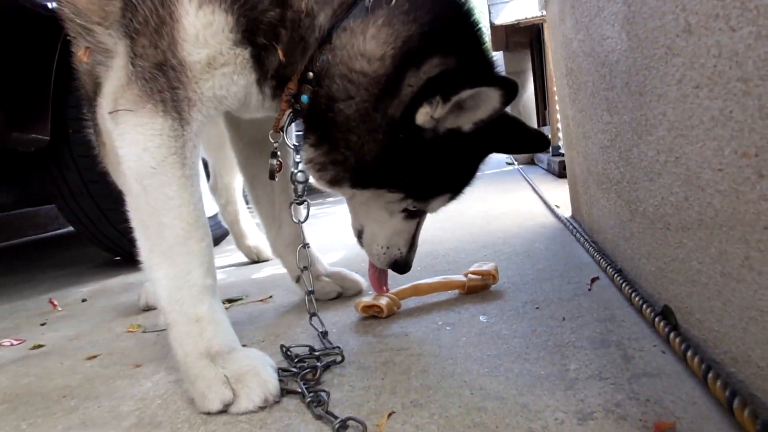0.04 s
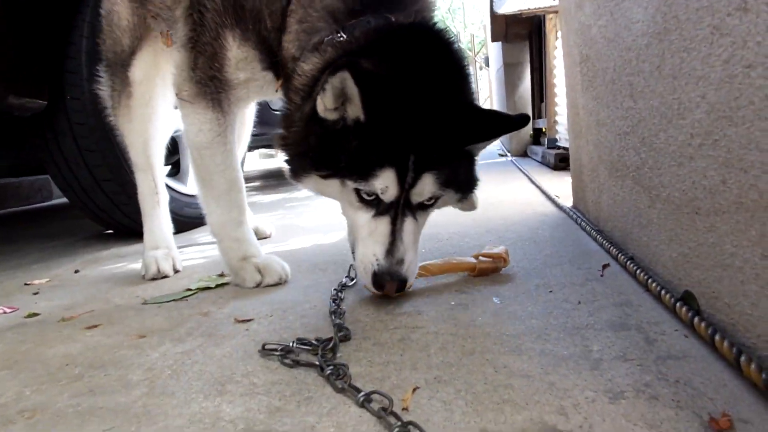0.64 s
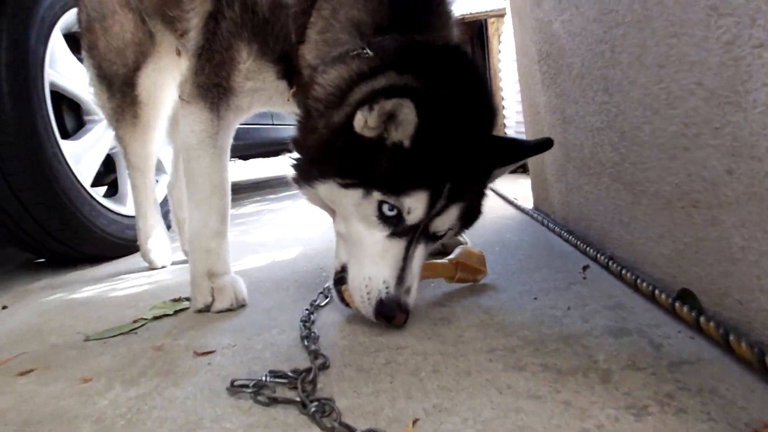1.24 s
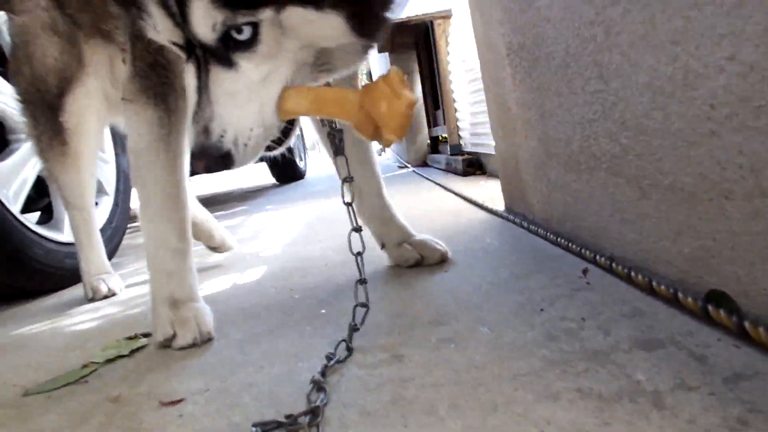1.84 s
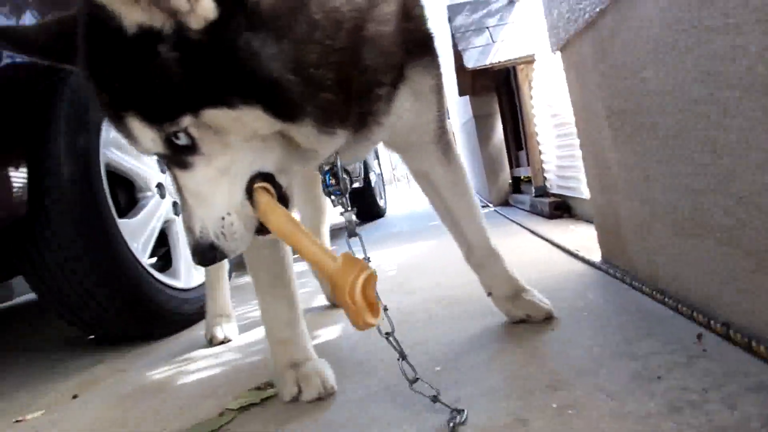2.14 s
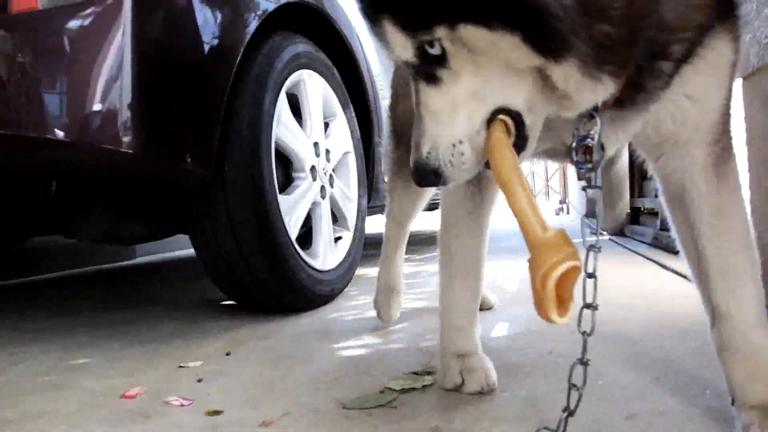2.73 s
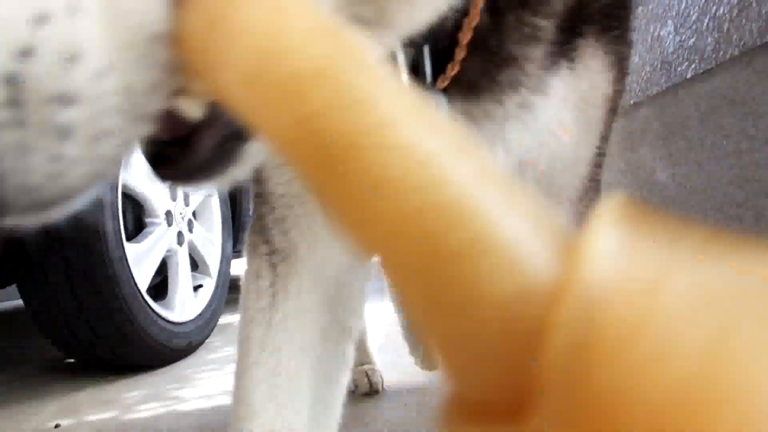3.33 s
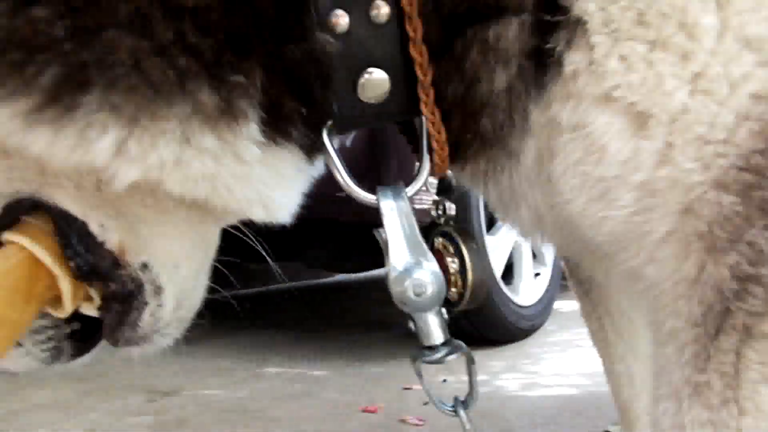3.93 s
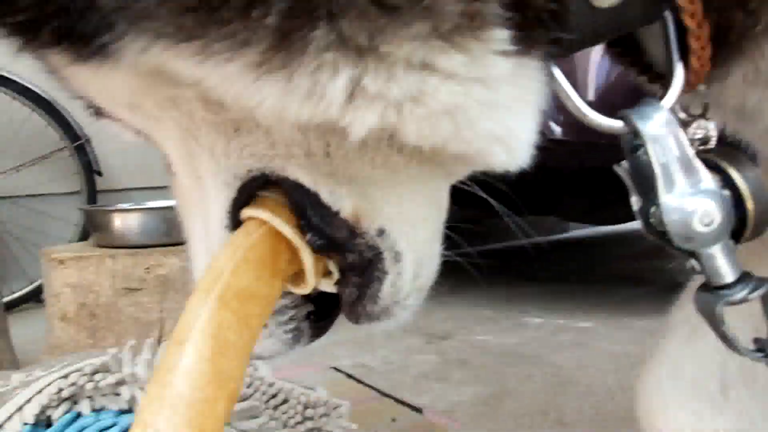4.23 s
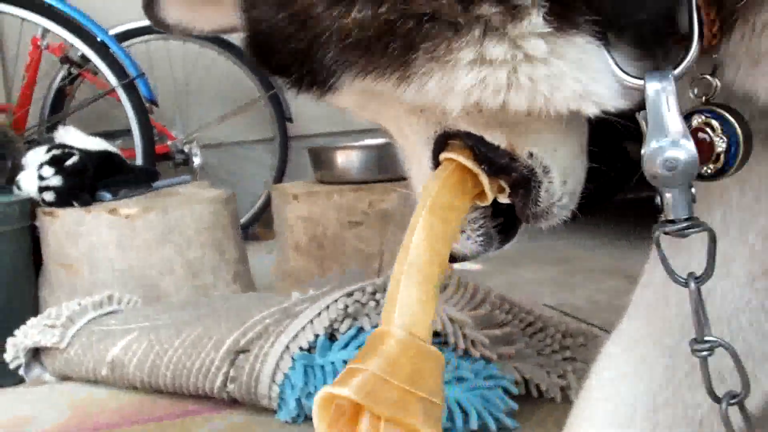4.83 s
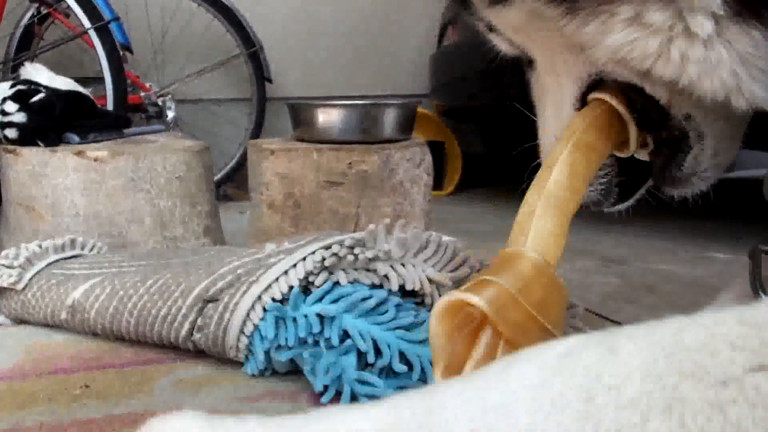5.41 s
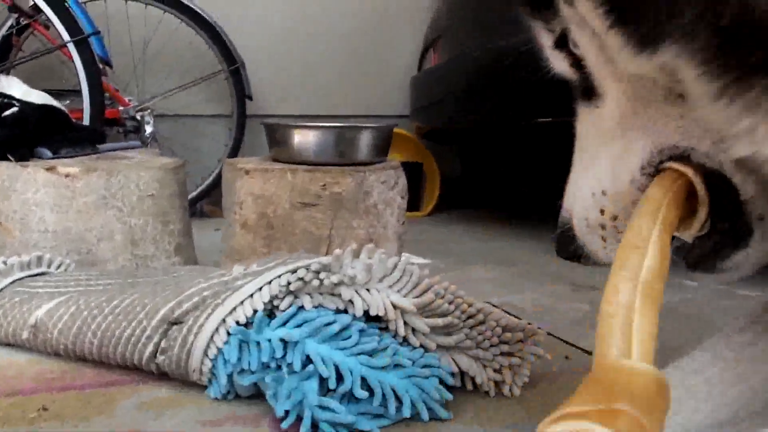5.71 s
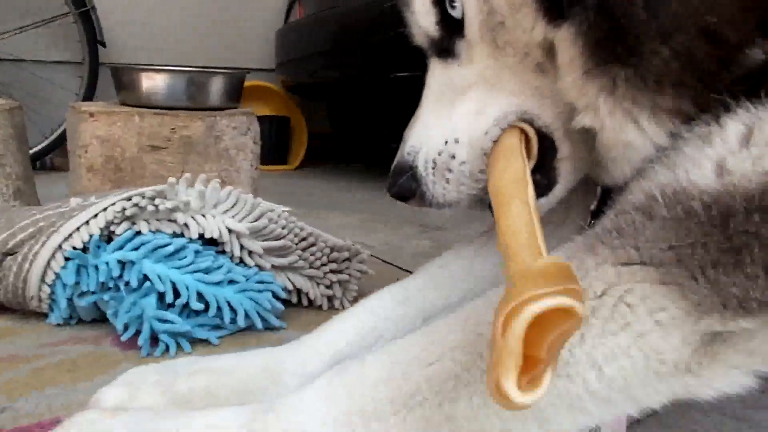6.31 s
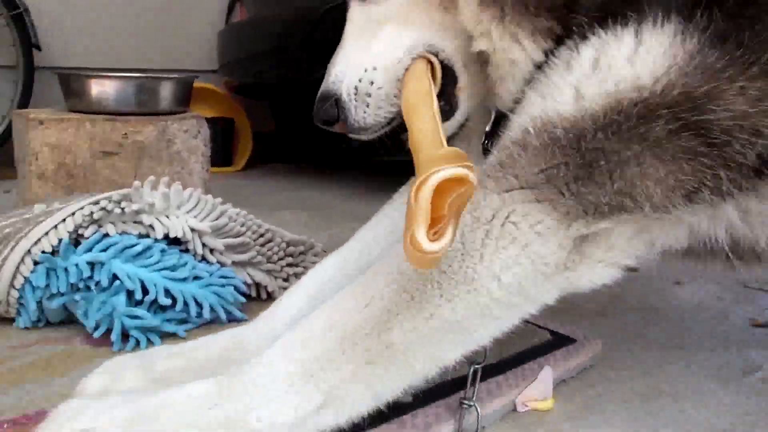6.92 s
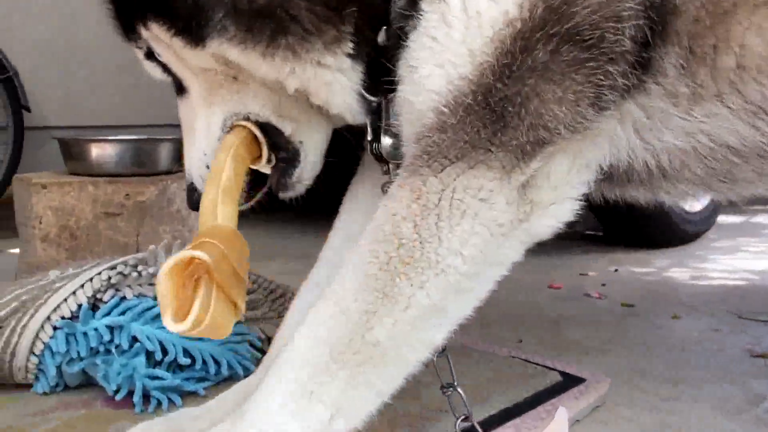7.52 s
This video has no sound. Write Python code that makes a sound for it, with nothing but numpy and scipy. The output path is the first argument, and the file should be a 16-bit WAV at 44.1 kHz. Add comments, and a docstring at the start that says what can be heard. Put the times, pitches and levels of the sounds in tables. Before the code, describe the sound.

A dog moves about a concrete carport, its chain clinking lightly and its paws scuffing. A rawhide bone clicks against the floor and teeth. Midway the bone knocks once right by the microphone, then crunches and creaks in the jaws. Softer chain pings, fur swishes and a few clicks follow. A low outdoor rumble and faint hiss continue throughout, and chain and bone echo briefly.

```python
"""Chained dog with a rawhide bone

A dog picks a bone off the concrete of a carport, carries it past the microphone and stretches on a mat.
Over a low outdoor rumble and a faint hiss, pads scuff, fur swishes and chain links rub and ping softly.
The bone clicks on teeth and floor, creaks as the teeth stick and slip, and knocks once close by.
Chain and bone echo briefly under the roof."""
import sys
import numpy as np
from scipy import signal
from scipy.fft import rfft, irfft
from scipy.io import wavfile

SR = 44100
rng = np.random.default_rng(int(sys.argv[2]) if len(sys.argv) > 2 else 0)


def transcribe(signal):
    """Save signal, clipped to [-1, 1], as a 16-bit WAV file at the path in sys.argv[1]."""
    frames = np.atleast_2d(signal).T
    limited = np.clip(frames, -1, 1)
    pcm = np.round(limited * 32767).astype(np.int16)
    wavfile.write(sys.argv[1], SR, pcm)


N = 333396
TIME = np.arange(N) / SR


def from_db(db):
    """Decibels to gain."""
    return 10 ** (np.asarray(db) / 20)


def rms_one(x):
    """Scale to rms 1."""
    return x / np.sqrt(np.mean(x ** 2) + 1e-20)


def peak_one(x):
    """Scale to peak 1."""
    return x / np.abs(x).max()


def at_hz(points, hz):
    """Interpolate a curve on a log-frequency axis."""
    f, value = np.transpose(points)
    return np.interp(np.log(hz), np.log(f), value)


def panned(x, pan_db):
    """Pan by level difference, left minus right."""
    return x * from_db(np.array([[.5], [-.5]]) * pan_db)


def add(track, t_s, sound):
    """Mix a sound into a track at t_s."""
    i = round(t_s * SR)
    track[..., i:i + sound.shape[-1]] += sound[..., :N - i]


def band(x, hz, kind, order=2):
    """Butterworth filter."""
    sos = signal.butter(order, np.clip(hz, 10, .45 * SR), kind, fs=SR, output="sos")
    return signal.sosfilt(sos, x + 1e-18)


def resonance(x, hz, width_hz):
    """Two-pole band-pass, unity peak gain."""
    r, w = np.exp(-np.pi * width_hz / SR), 2 * np.pi * hz / SR
    return signal.lfilter(np.array([1, 0, -1]) * (1 - r * r) / 2, [1, -2 * r * np.cos(w), r * r], x + 1e-18)


def ring(force, hz, t60_s):
    """One mode: a unit impulse starts a decaying unit sine."""
    r, w = np.exp(-np.log(1000) / (t60_s * SR)), 2 * np.pi * hz / SR
    return signal.lfilter([0, np.sin(w)], [1, -2 * r * np.cos(w), r * r], force + 1e-18)


def decay(t60_s, size):
    """Exponential decay from 1."""
    return np.exp(-np.log(1000) * TIME[:size] / t60_s)


def swell(start_s, peak_s, end_s, depth_db, fade_s):
    """Envelope of one movement: up by depth_db to 1, down as far, faded at both ends."""
    gate = np.clip(1 + np.minimum(TIME - start_s, end_s - TIME) / fade_s, 0, 1)
    return gate * from_db(np.interp(TIME, np.sort([start_s, peak_s, end_s]), [-depth_db, 0, -depth_db]))


def drift(rate_hz):
    """Interpolated random steps, rms 1."""
    steps = rng.standard_normal(4096)
    return rms_one(np.interp(TIME * rate_hz, np.arange(len(steps)), steps))


def grains(per_s, spread_db):
    """Random clicks of uneven size and sign, rms 1."""
    sizes = from_db(spread_db * np.minimum(rng.exponential(1, N), 3)) * rng.choice([-1, 1], N)
    return rms_one(sizes * (rng.random(N) < per_s / SR))


def contact(rough, t60_s, size=2048):
    """Contact force: a unit click, then a brief crunch."""
    force = rough * rng.standard_normal(size) * decay(t60_s, size)
    force[0] = 1
    return force


# Left-right coherence: f/Hz, coherence/1
COHERENCE = [(30, 0.14), (70, 0.79), (250, 0.78), (600, 0.65), (1200, 0.69), (2500, 0.36), (8000, 0.038)]
# Left-right balance: f/Hz, pan/dB
BALANCE = [(60, 2.5), (180, 3.0), (550, 4), (1650, 1), (4970, 0), (15000, 0)]
def wide_noise(spectrum, left_lag_s=.00004):
    """Coloured stereo noise, most coherent in the low mids and upper bass, rms 1."""
    hz = np.maximum(np.arange(N // 2 + 1) * SR / N, 1)
    mid, side = rfft(rng.standard_normal((2, N)))
    coherence = at_hz(COHERENCE, hz)
    pair = np.sqrt(1 + coherence) * mid + np.sqrt(1 - coherence) * side * [[1], [-1]]
    pair[0] *= np.exp(-2j * np.pi * hz * left_lag_s)
    pair = panned(pair, at_hz(BALANCE, hz))
    return rms_one(irfft(pair * from_db(at_hz(spectrum, hz)), N))


# Background noise spectrum: f/Hz, density/dB
BACKGROUND_SPECTRUM = [(15, -32), (25, -6.5), (79, -0.5), (178, 0), (281, -0.5), (399, -5), (895, -7.5),
                       (2170, -22.5), (4040, -31.5), (6550, -46), (13900, -60.5), (15500, -74)]
def background_noise(rms_db=-47):
    """Steady background noise: a low outdoor rumble with a faint, even hiss above it."""
    return from_db(rms_db) * wide_noise(BACKGROUND_SPECTRUM)


# Carport reverberation: f/Hz, t60/s
CARPORT_DECAY = [(200, 0.19), (1200, 0.41), (4000, 0.1), (14000, 0.27)]
def carport(x, wet_db, early_db=9, early_t60_s=0.29, predelay_s=0.0029, size=22050):
    """Add quick reflections off wall, car and floor, and a faint tail, longest in the mids."""
    edges_hz = 22 * 2 ** np.arange(0, 9.6, .5)   # half octaves
    white = rng.standard_normal((2, 2, size))
    tail = np.zeros((2, size))
    for k, (lo, hi) in enumerate(zip(edges_hz, edges_hz[1:])):
        t60_s = at_hz(CARPORT_DECAY, np.sqrt(lo * hi))
        tail += band(white[k % 2], [lo, hi], "band") * decay(t60_s, size)
    early_boost = 1 + from_db(early_db) * decay(early_t60_s, size)
    onset = np.clip(TIME[:size] / predelay_s - 1, 0, 1)
    response = rms_one(tail * early_boost * onset) / np.sqrt(size)
    return x + from_db(wet_db) * signal.fftconvolve(x, response, axes=1)[:, :N]


# Dog movements: start/s, peak/s, end/s, pad level/dB, coat level/dB
MOVEMENTS = [(0.0, 0.288, 0.53, -55, -60.5), (0.942, 1.5, 1.8, -56, -65),
             (1.997, 2.096, 2.46, -61.5, -68.5), (2.68, 3.158, 3.33, -57, -66),
             (3.413, 3.628, 3.846, -48, -67), (3.944, 4.128, 4.17, -44, -52),
             (4.24, 4.68, 4.83, -55, -59.5), (5.542, 5.622, 5.68, -50, -62),
             (5.764, 5.976, 6.54, -52.5, -78), (5.95, 5.985, 6.02, -52.5, -64.5),
             (6.897, 7.098, 7.1, -62.5, -84)]
# Coat brushing past things: t/s, half length/s, level/dB
COAT_BRUSHES = [(2.763, 0.058, -68), (5.355, 0.013, -51.5), (7.036, 0.051, -65.5), (7.236, 0.025, -68),
                (7.388, 0.017, -64.5)]
# Pad friction spectrum: f/Hz, density/dB
PAD_SPECTRUM = [(200, -28), (500, 3.5), (1100, 3), (1400, 1), (1900, 0.5), (2600, -4.5), (4000, -18),
                (7000, -40.5), (15000, -55)]
# Coat friction spectrum: f/Hz, density/dB
COAT_SPECTRUM = [(800, -42), (2000, -5.5), (3200, 0.5), (4500, -7.5), (5600, -12.5), (7000, -23),
                 (10000, -28), (15000, -52)]
def rustle(pad_gain_db=-1.0):
    """Pads scuff on concrete or mat and the coat swishes; friction catches and releases in a fine rasp."""
    pads, coat = np.zeros((2, N))
    for start_s, peak_s, end_s, pad_db, coat_db in MOVEMENTS:
        speed = swell(start_s, peak_s, end_s, depth_db=4, fade_s=0.062)
        pads += from_db(pad_db + pad_gain_db) * speed
        coat += from_db(coat_db) * speed
    for t_s, half_s, level_db in COAT_BRUSHES:
        coat += from_db(level_db) * np.exp(-((TIME - t_s) / half_s) ** 2)
    scuff = pads * from_db(2.5 * drift(rate_hz=250)) * wide_noise(PAD_SPECTRUM)
    swish = coat * from_db(2.3 * drift(rate_hz=300)) * wide_noise(COAT_SPECTRUM)
    return scuff + swish


def bending_gain(hz, bend_db, below_hz=6400):
    """Gain of a link's low, bending modes only; how freely they ring depends on slack."""
    return from_db(bend_db * (hz < below_hz))


# Chain link modes: f/Hz, level/dB, t60/s, pan/dB
STEEL_MODES = [(2670, 4, 0.028, -4), (3500, 3.5, 0.06, -1.5), (5530, -1, 0.05, 5), (7640, -7.5, 0.02, 3),
               (8260, 0, 0.025, 4), (8700, -1, 0.023, 3), (9600, -1.5, 0.024, 3), (10060, 0, 0.035, -0.5),
               (11030, -1, 0.032, -1), (12280, -4, 0.03, -5), (13300, -14, 0.028, -6),
               (14060, -3.5, 0.026, -6.5), (15350, -16, .025, -6)]
# Chain swings: start/s, peak/s, end/s, level/dB, bending gain/dB, rasp gain/dB
CHAIN_SWINGS = [(0.0, 0.11, 0.17, -75, -7, -3), (0.147, 0.32, 0.4, -66.5, 4, -3),
                (1.44, 1.62, 1.78, -74.5, 2, 12), (2.255, 2.28, 2.32, -77, -2, 1),
                (2.35, 2.43, 2.47, -73.5, 3, 1), (2.936, 3.18, 3.47, -64.5, 2, 3),
                (3.39, 3.61, 3.85, -70, 0, 19), (3.87, 3.983, 4.32, -73, 1, 15),
                (4.348, 4.588, 4.86, -71.5, 1, 15), (5.565, 5.605, 5.93, -82.5, 8, -3),
                (5.94, 5.97, 6.02, -72, -2, 11), (6.334, 6.363, 6, -71, -5, 1)]
def chain_jingle(links=7, detune=0.023, gain_db=-28.5, rasp_gain_db=3, uneven_db=3.5, idle_db=-106):
    """Slightly detuned links rub and jostle; the shifting contact favours one mode, then another."""
    swings = [(from_db(level_db) * swell(*times_s, depth_db=8.5, fade_s=0.018), bend_db, rasp_db)
              for *times_s, level_db, bend_db, rasp_db in CHAIN_SWINGS]
    touches = [from_db(gain_db) * grains(per_s=45, spread_db=3.5) for link in range(links)]
    rubbing = sum(swing * from_db(rasp_db + rasp_gain_db + gain_db) for swing, _, rasp_db in swings)
    coarse_grit = 1.2 * grains(per_s=150, spread_db=4)
    fine_grit = .7 * np.array([grains(per_s=1200, spread_db=3) for side in range(2)])
    out = 2 * band(rubbing * (coarse_grit + fine_grit), [2300, 11500], "band", order=3)
    for hz, mode_db, t60_s, pan_db in STEEL_MODES:
        motion = from_db(idle_db) + sum(swing * bending_gain(hz, bend_db) for swing, bend_db, _ in swings)
        drive = motion * from_db(mode_db + uneven_db * drift(rate_hz=70))
        for link, hits in enumerate(touches):
            link_hz = hz * (1 + detune * ((link + rng.random()) / links * 2 - 1))
            lobes = rng.choice([-1, 1], (2, 1))   # each side hears its own lobe of the mode
            out += lobes * panned(0.81, pan_db) * ring(drive * hits, link_hz, t60_s)
    return out


def stray_clinks(count=14, level_db=-74, spread_db=3, crack_db=-6):
    """Faint random pings of the hanging chain, as LINK_STRIKES rows."""
    return [(moment * (N - 1) / SR, level_db + spread_db * (2 * strength - 1), 0, crack_db)
            for moment, strength in rng.random((count, 2))]


# Distinct link-on-link strikes: t/s, level/dB, bending gain/dB, crack gain/dB
LINK_STRIKES = [(0.0188, -49, 7, 11.5), (0.146, -53, 7, -8), (0.165, -37.5, -1, -9), (0.181, -40, 0, -6),
                (0.228, -64, 8, -5), (0.2554, -46, 5, -5), (0.277, -50, -1, -3), (0.286, -43, 2, -3),
                (0.307, -48, 8, -9), (0.341, -47, 6, 1), (0.361, -45, 3, -1), (0.379, -46, -3, 0),
                (0.4678, -57.5, -9, 3), (0.5142, -66, -3, 7), (0.593, -62.5, 9, 10.5), (1.464, -57, -6, 2),
                (1.498, -55, 2, 2), (1.55, -55, -8, 4), (1.601, -56, -6, 2), (1.989, -68, -2, 8),
                (2.009, -55, -14, -3), (2.269, -52, 0.5, -3), (2.292, -51.5, -7, -3), (2.3485, -63, -6, -2),
                (2.3944, -55, -6, -1), (2.4235, -50, -5, 0), (2.4604, -54.5, 4, 5), (2.7812, -46.5, -9, -7),
                (2.9342, -56, -2, -3), (2.9536, -50, -4, -3), (2.997, -64, -9, -1), (3.016, -53.5, 9, 7),
                (3.049, -51, 12, -2), (3.086, -53, 0, 2), (3.1045, -44.5, 5, 5), (3.1502, -48, 0, 1),
                (3.427, -48, 0, 8), (3.5079, -54, -6, 5), (3.5351, -56, -8, 10), (3.5965, -53, -4, 8),
                (3.6143, -51, -4, 10), (3.702, -55, -4, 7), (3.986, -45, 3, 4), (3.999, -44, 0, 5),
                (4.3273, -63, -6, 6), (4.4021, -63, -6, 6), (4.4305, -61, -6, 4), (4.442, -56, -4, 4),
                (4.56, -52, -2, 4), (4.5782, -57, -3, 5), (4.585, -52, 3, 10), (4.6445, -65, -3, 5),
                (4.671, -50, -3, 7), (4.692, -53, -5, 6), (4.7311, -49, 7, 7), (4.778, -51, 14, 11.5),
                (4.851, -62, 1, 8), (5.1235, -57, -5, -8), (5.146, -54, -1, -7), (5.217, -48.5, -9, -10),
                (5.228, -63, -3, -8), (5.4762, -63, 4, -4), (5.584, -54, 5, -2), (5.608, -51, 7, 1),
                (5.62, -49, 3, -2), (5.656, -49, -1, 0), (5.7057, -72, -2, -4), (5.755, -52, 5, -12),
                (5.948, -58, -7, 8), (6.1886, -66, 0, -4), (6.211, -60, 1, -3), (6.2799, -60, 4, -1),
                (6.3325, -55.5, 13, -3), (6.3491, -49, 13.5, 4), (6.3744, -53, -6, -7.5),
                (6.3935, -52, 5, 2), (6.586, -64, 5, -7), (6.6127, -57.5, 11, -10), (6.7314, -65, -4, -3),
                (6.875, -65, 6, -8), (6.947, -69, 12, -8), (7.4843, -62, -3, -4), (7.524, -62, -3, 0)]
def chain_clinks(ring_gain_db=-15, crack_gain_db=-1.5, detune=0.0093, uneven_db=1.0, t60_scale=1.2,
                 tap_hz=5400, tap_db_per_octave=10, phase_hz_per_rad=6000, size=6000):
    """Link strikes link: a dry steel crack, then both ping, ringing longer than links that rub."""
    out = np.zeros((2, N))
    for t_s, level_db, bend_db, crack_db in LINK_STRIKES + stray_clinks():
        force = contact(rough=0.58, t60_s=0.013)
        force = force + np.array([contact(rough=1.0, t60_s=0.021) for side in range(2)])
        crack = peak_one(band(force, [1600, 10500], "band"))
        add(out, t_s, from_db(level_db + crack_db + crack_gain_db) * crack)
        for hz, mode_db, t60_s, pan_db in STEEL_MODES:
            tap_db = tap_db_per_octave * min(np.log2(hz / tap_hz), 0)   # a tap barely stirs low modes
            envelope = bending_gain(hz, bend_db) * decay(t60_scale * t60_s, size) / np.sqrt(2)
            for link in range(2):
                link_hz = hz * (1 + detune * rng.standard_normal())
                phase = rng.uniform(0, 2 * np.pi)
                side_phase = rng.standard_normal((2, 1)) * hz / phase_hz_per_rad
                ping = envelope * np.sin(2 * np.pi * link_hz * TIME[:size] + phase + side_phase)
                ping_db = level_db + ring_gain_db + mode_db + tap_db + uneven_db * rng.standard_normal()
                add(out, t_s, panned(from_db(ping_db) * ping, pan_db))
    return out


# Whole-bone modes: f/Hz, level/dB, t60/s
RAWHIDE_MODES = [(322, -41, 0.012), (407, -19.5, 0.083), (544, -24, 0.027), (730, -15, 0.017),
                 (850, -24.5, 0.032), (1166, -9, 0.01), (1740, -11.5, 0.021), (2230, -13, 0.0048),
                 (2986, -20, 0.02), (4340, -11.5, 0.0046), (5150, -20.5, 0.007), (5320, -21, 0.0067)]
def bone_ring(force):
    """The whole bone rings; adjacent modes alternate in sign, each reaching the two sides unequally."""
    return sum((-1) ** k * from_db(level_db) * panned(ring(force, hz, t60_s), pan_db=rng.uniform(0, 5.5))
               for k, (hz, level_db, t60_s) in enumerate(RAWHIDE_MODES))


# Bone on teeth and floor: t/s, level/dB, snap f/Hz, body gain/dB, body f/Hz, enamel tick gain/dB
BONE_CONTACTS = [(0.1625, -43.5, 3580, 7, 700, -15), (0.3856, -48, 2680, 18, 450, -18),
                 (0.455, -38, 2200, -14, 480, -28), (0.8134, -38, 3370, 12, 940, -15),
                 (0.819, -50.5, 2200, 16, 1010, -12), (0.829, -54.5, 4850, -6, 700, 5),
                 (0.9362, -52.5, 3230, 22, 970, -11), (0.9445, -43, 3260, 14.5, 920, 3.5),
                 (1.009, -50.5, 5200, -10, 830, -1), (1.017, -43, 3200, -10, 830, 1),
                 (1.125, -36, 2480, -4, 350, 0.5), (1.152, -44, 3400, -1, 900, -7),
                 (1.1635, -36.5, 2290, -6, 990, -6), (1.229, -39, 1800, 0, 730, -11),
                 (1.235, -51, 4500, -10, 730, -6), (1.2742, -36, 2550, -1, 820, -8),
                 (1.3048, -36.5, 2330, 1.5, 945, -2), (1.4468, -45, 2650, 13, 400, -6),
                 (1.5329, -48.5, 2300, 16, 613, -20), (1.978, -37, 1880, -4, 1100, -14),
                 (2.0359, -42, 3850, 17.5, 1064, 3), (2.0362, -27.5, 1730, -13, 1050, -15),
                 (2.0674, -46.5, 3880, 9, 875, 4), (2.4204, -53, 3420, 15, 352.3, -18),
                 (3.1947, -29, 3880, -5, 1000, -33), (3.2161, -49.5, 3420, 22.5, 710, -16),
                 (3.2622, -43.5, 2940, 13.5, 720, -22), (3.3301, -33, 3720, 1.5, 1000, -13),
                 (3.487, -44, 6100, -7, 820, -9), (3.549, -45.5, 5500, -8, 700, -4),
                 (3.674, -45.5, 5500, -7, 470, 3), (3.752, -54, 6400, 0, 700, -1),
                 (3.8165, -51, 5440, -11, 700, -9), (3.829, -34, 2560, -11, 355, -0.5),
                 (3.9165, -29, 5300, -7, 706, -4), (3.9312, -34, 5530, -19, 730, 2),
                 (3.948, -41, 5600, -11, 780, -10), (4.007, -44, 6640, -4, 780, 0),
                 (4.0718, -29.5, 3720, -17, 970, -26), (4.0815, -37, 3670, -5, 830, -20),
                 (4.0846, -27, 2590, -21, 830, -26), (4.2225, -37, 2720, -11, 640, 3.5),
                 (4.2537, -40.5, 3600, -13, 640, -13), (5.3318, -38.5, 2950, -21, 460, -5.5),
                 (5.353, -36.5, 4150, -22, 350, -18), (6.4298, -48, 5150, 5, 830, 3),
                 (6.4308, -45, 2580, -8, 820, -0.5)]
def bone_clicks(snap_gain_db=-1, body_gain_db=1, overtone_ratio=1.24, overtone_db=-7, ring_db=-9,
                splinter_db=-27):
    """A bright snap over a hollow body note, both set by the grip; enamel ticks, hide fibres splinter."""
    out = np.zeros((2, N))
    for t_s, level_db, snap_hz, body_db, body_hz, tick_db in BONE_CONTACTS:
        force = contact(rough=0.7, t60_s=0.011)
        force = force + np.array([contact(rough=0.22, t60_s=0.042) for side in range(2)])
        snap = band(resonance(force, snap_hz, width_hz=380), [.5 * snap_hz, 1.12 * snap_hz], "band")
        enamel = band(resonance(force, hz=4500, width_hz=2000), [2200, 5200], "band", order=3)
        splinters = from_db(splinter_db) * band(force, [6500, 12000], "band")
        overtone = from_db(overtone_db) * resonance(force, overtone_ratio * body_hz, width_hz=610)
        body = band(resonance(force, body_hz, width_hz=210) - overtone, [280, 2150], "band")
        ringing = from_db(ring_db) * peak_one(bone_ring(band(force, 1300, "low")))
        click = from_db(snap_gain_db) * peak_one(snap)
        click += from_db(tick_db) * peak_one(enamel + splinters)
        click += from_db(body_db + body_gain_db) * (peak_one(body) + ringing)
        add(out, t_s, from_db(level_db) * click)
    return out


# Side resonances of the gripped bone: f/Hz, width/Hz, level/dB
GRIP_RESONANCES = [(344, 130, -7), (1750, 170, -11.5), (2300, 130, -21), (3720, 77, -27), (5630, 790, -46)]
def gripped_bone(force, hz, bright_db, width_hz=115):
    """Bone between the jaws: one strong hollow resonance, several weaker ones scaled by bright_db."""
    hollow = resonance(band(force, 1060, "low"), hz, width_hz)
    others = sum(from_db(level_db + bright_db) * resonance(force, peak_hz, peak_width_hz)
                 for peak_hz, peak_width_hz, level_db in GRIP_RESONANCES)
    return band(band(hollow + others, 107, "high"), 4800, "low", order=3)


# Grinding strokes: start/s, peak/s, end/s, level/dB, hollow f/Hz, width/Hz, brightness/dB
TOOTH_STROKES = [(1.098, 1.173, 1.29, -46, 1070, 260, 1), (1.376, 1.387, 1.42, -43.5, 780, 300, -7),
                 (3.215, 3.221, 3.46, -38.5, 725, 260, 0), (3.31, 3.363, 3.58, -35, 790, 170, -2.5),
                 (3.386, 3.406, 3.684, -42.5, 1190, 230, 2), (3.985, 4.045, 4.03, -34.5, 880, 150, -4),
                 (4.036, 4.148, 4.195, -30.5, 910, 115, -3.5)]
# Hard tooth slips: t/s, level/dB, hollow f/Hz, brightness/dB
TOOTH_SLIPS = [(3.953, -32.5, 780, -10), (4.026, -29.5, 820, -12), (4.069, -24.5, 990, -6),
               (4.08, -23, 885, -6), (4.086, -26, 890, -13), (4.102, -20, 960, -24),
               (4.139, -25.5, 920, -9), (4.17, -26, 890, 2.5)]
def teeth_grinding(stroke_gain_db=-2, slip_gain_db=1, pan_db=2.0):
    """Teeth stick and slip along the hide: a dense crunch with a few hard slips."""
    out = np.zeros((2, N))
    for *times_s, level_db, hz, width_hz, bright_db in TOOTH_STROKES:
        crunch = grains(per_s=800, spread_db=0.5) + 0.33 * rng.standard_normal((2, N))
        pressure = from_db(level_db + stroke_gain_db) * swell(*times_s, depth_db=13.5, fade_s=0.013)
        out += pressure * rms_one(gripped_bone(crunch, hz, bright_db, width_hz))
    for t_s, level_db, hz, bright_db in TOOTH_SLIPS:
        slip = gripped_bone(contact(rough=0.2, t60_s=0.017), hz, bright_db)
        add(out, t_s, from_db(level_db + slip_gain_db) * peak_one(slip))
    return panned(out, pan_db)


# Contacts within the one knock: t/s, level/dB, force low-pass f/Hz
KNOCK_CONTACTS = [(3.3874, -10, 6000), (3.3889, 2, 1980), (3.3908, -4.5, 975), (3.3928, -10, 5000),
                  (3.397, -23, 1200)]
def bone_knock(size=8192):
    """The bone bumps something by the microphone and chatters for a few milliseconds."""
    out = np.zeros((2, N))
    for t_s, level_db, cutoff_hz in KNOCK_CONTACTS:
        force = band(signal.unit_impulse(size), cutoff_hz, "low", order=1)
        add(out, t_s, from_db(level_db) * band(bone_ring(force), [220, 6800], "band", order=3))
    return out


def scene():
    """Dog, chain and bone under the carport roof, over steady background noise."""
    background = background_noise()
    chewing = carport(bone_clicks() + teeth_grinding(), wet_db=-11.5)
    paws_and_fur = rustle()
    chain = carport(chain_jingle() + chain_clinks(), wet_db=-10.0)
    knock = carport(bone_knock(), wet_db=-12.0)
    return background + paws_and_fur + chain + chewing + knock


def record(dry):
    """Steep elliptic low-pass."""
    cutoff_hz = 15750
    return signal.sosfilt(signal.ellip(10, .2, 70, cutoff_hz, fs=SR, output="sos"), dry)


dry = scene()
out = record(dry)
transcribe(out)
```